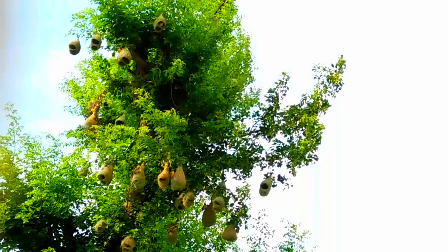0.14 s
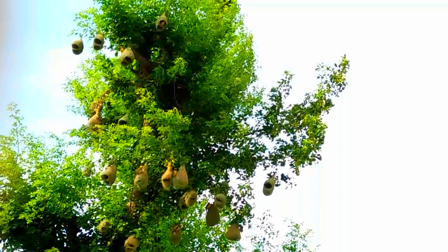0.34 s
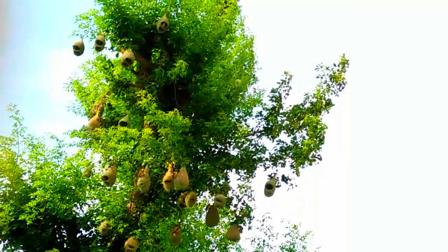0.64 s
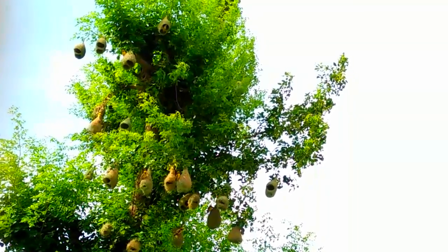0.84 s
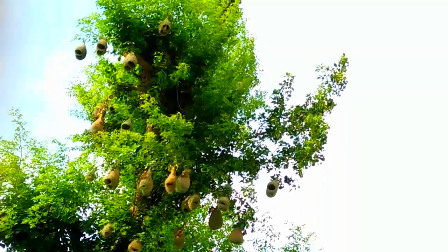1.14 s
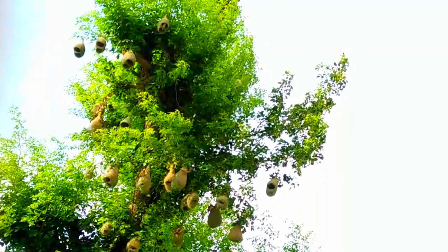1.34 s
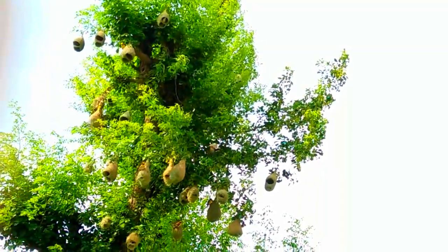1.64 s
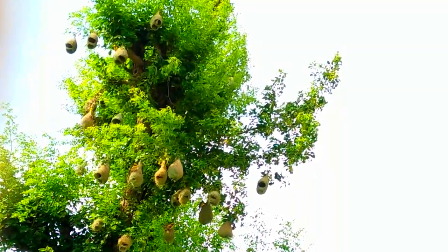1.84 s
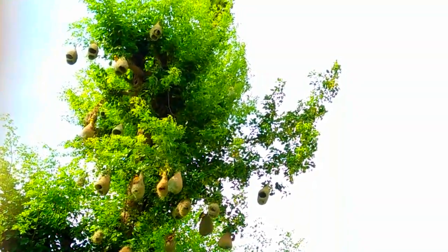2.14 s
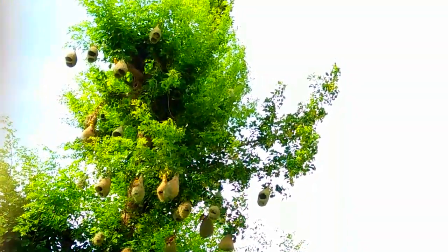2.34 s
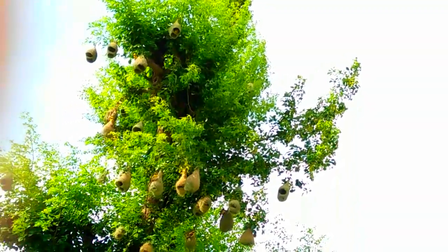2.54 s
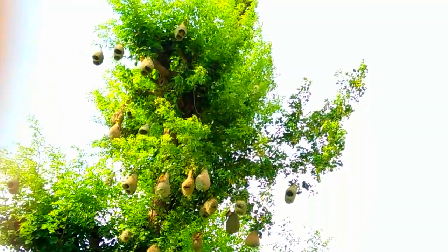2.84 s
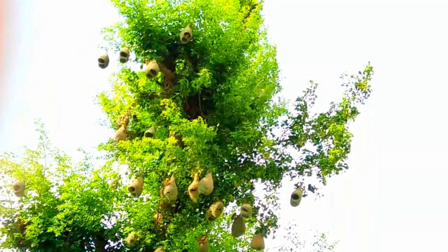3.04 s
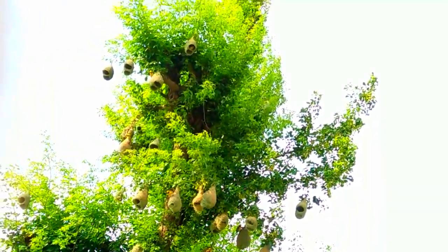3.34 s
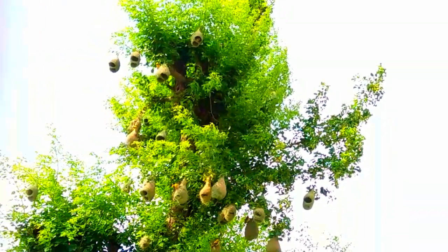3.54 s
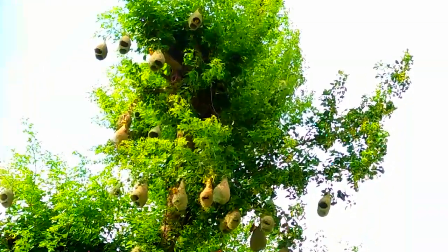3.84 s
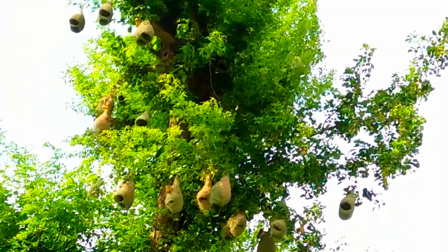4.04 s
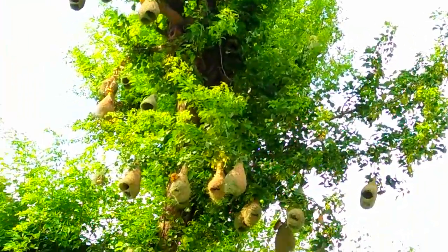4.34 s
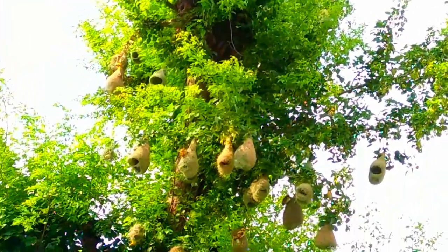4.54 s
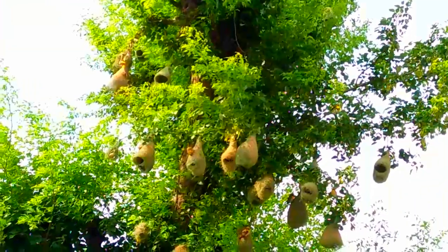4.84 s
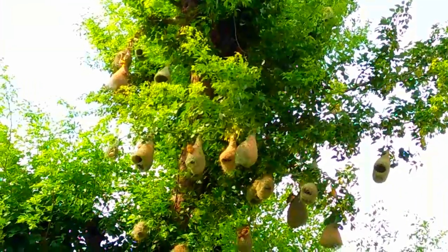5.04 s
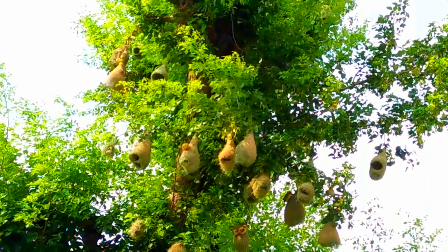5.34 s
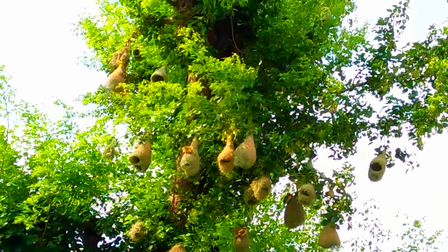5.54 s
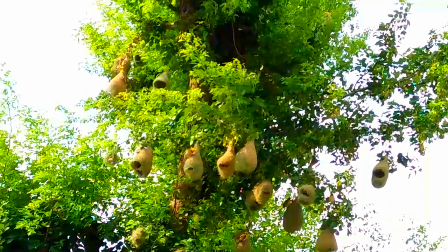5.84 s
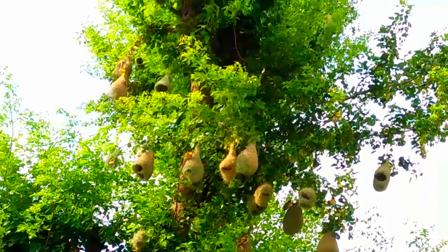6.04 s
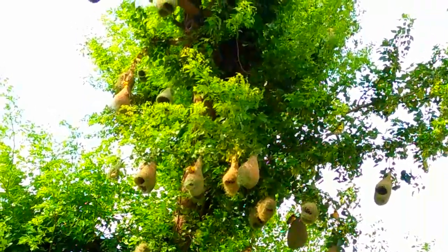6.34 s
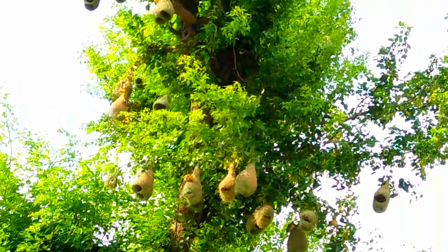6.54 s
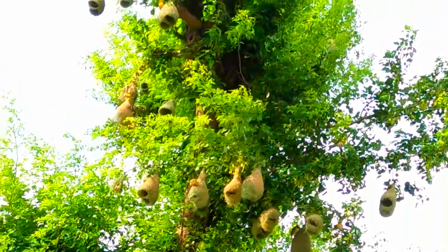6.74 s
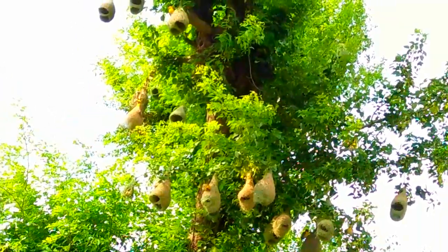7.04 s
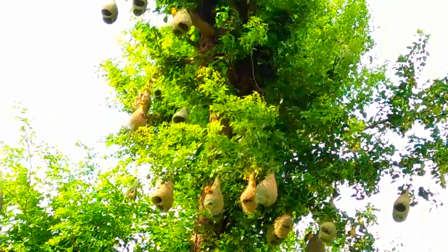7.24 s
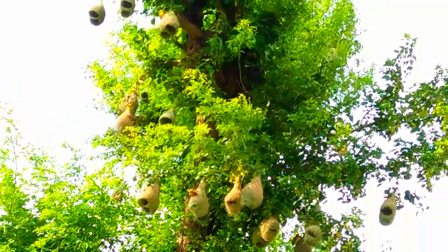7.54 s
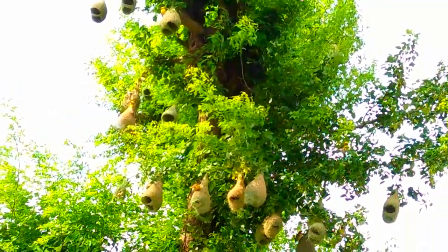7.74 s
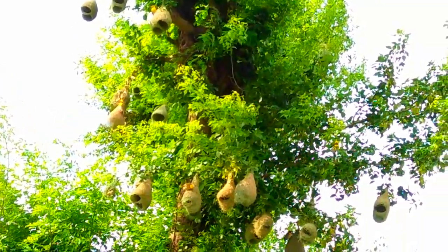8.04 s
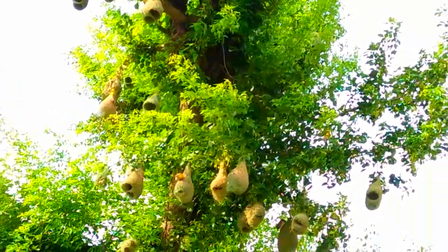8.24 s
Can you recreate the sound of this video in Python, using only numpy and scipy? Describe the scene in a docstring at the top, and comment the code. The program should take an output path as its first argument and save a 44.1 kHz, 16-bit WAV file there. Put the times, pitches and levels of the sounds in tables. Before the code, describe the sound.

Dense, overlapping buzzy wheezes, thin whistles and quick warbled chirps from a small-bird flock outdoors, over soft rumbling puffs of wind.

```python
"""Weaver bird colony in a tree

A colony sings around its hanging nests: pulses and noise through two resonances give long wheezes.
Gliding tones give thin whistles, falling slurs, stuttered pips and warbled chirps; noise gives dry rasps.
Leaves scatter the birds with a decaying tail, wind buffets the microphone as shaped noise,
and a few soft ticks, which are filtered impulses, sound close to it."""
import sys
import numpy as np
from scipy import signal
from scipy.fft import rfft, irfft
from scipy.io import wavfile
from scipy.ndimage import uniform_filter1d

SR = 44100
rng = np.random.default_rng(int(sys.argv[2]) if len(sys.argv) > 2 else 0)


def inscribe(sig):
    """Save sig as 16-bit PCM at rate SR to the path in sys.argv[1].

    A 1-D sig is mono; a 2-D sig holds one channel per row.
    Samples are clipped to [-1, 1] before scaling.
    """
    pcm = np.round(np.clip(np.atleast_2d(sig).T, -1, 1) * 32767)
    wavfile.write(sys.argv[1], SR, pcm.astype(np.int16))


N = 370440
TIME = np.arange(N) / SR   # t/s
BINS = np.fft.rfftfreq(N, 1 / SR)   # f/Hz

# All levels are relative, before any gain shared by a source.
# Wheezes: [start t/s, end t/s, lower resonance level/dB, upper resonance level/dB,
#           overtones re lower resonance level/dB, swell/(dB per s)]
WHEEZES = [(-.06, 0.456, -47.5, -51, -7, -31), (0.566, 0.997, -56, -54.5, -11, -6),
           (0.765, 1.771, -49.5, -49, -5.5, 4), (1.796, 2.46, -59.5, -66.5, -2, 6.5),
           (1.995, 2.174, -42.5, -57, -2, 1), (2.35, 3.215, -51.5, -55, -4.5, -8.5),
           (3.154, 4.41, -56.5, -71, 1, 3), (5.223, 6.575, -50.5, -55.5, -6.5, -4),
           (6.447, 7.82, -66, -71.5, -3.5, -6)]
# Throat resonances, the lower one with its overtones: [f/Hz, level/dB]
LOWER_COLOUR = [(2700, -24), (3100, -22.5), (3550, -11.5), (3850, -7.5), (4300, -4.5), (4900, -10.5),
                (7300, -28.5), (8600, -17.5), (10000, -24), (11600, -19), (14000, -34)]
UPPER_COLOUR = [(4950, -9.5), (5450, 1.5), (5750, -0.5), (6500, -21.5)]
# Narrow ringing peaks of the wheeze: [f/Hz]
RINGING_HZ = [3650, 4236, 5407]
WHEEZE_ATTACK_S, WHEEZE_RELEASE_S = 0.071, 0.14

# Drawn-out whistles: [start t/s, end t/s, first f/Hz, held f/Hz, closing bend f/Hz,
#                      first level/dB, held level/dB, closing level/dB, flutter depth/1]
WHISTLES = [ (0.021, 0.343, 3187, 3600, 7, -43, -49.5, -49.5, 0.56),
            (0.194, 0.322, 2940, 3460, 76, -49, -43, -44, 0.2),
            (0.289, 0.598, 3690, 3560, 8, -39, -50.5, -38.5, 0.77),
            (0.454, 0.639, 3582, 3470, -280, -40.5, -49, -38.5, 0.3),
            (1.047, 1.724, 3000, 3650, -220, -47.5, -57.5, -39, 0),
            (1.776, 2.198, 3015, 3692, 83, -50, -53.5, -44.5, 0.3),
            (2.286, 2.386, 3310, 3884, -160, -50.5, -36, -39.5, 0),
            (2.396, 2.992, 3028, 3585, 189, -47, -49.5, -38.5, 0.15),
            (4.1, 4.189, 4285, 4210, 377, -39.5, -38, -40.5, 0.1),
            (4.417, 4.937, 3353, 3798, -85, -43, -54, -48, 0.54),
            (4.909, 5.039, 3693, 3653, -130, -42.5, -44, -45.5, 0),
            (5.815, 6.357, 2860, 3606, 14, -59, -55.5, -46.5, 0.05)]
GLIDE_S, SETTLE_S = .15, 0.11   # settling times of pitch and level after the start
SWELL_S, BEND_S = 0.15, .045   # time scales of the closing swell and bend
FLUTTER_HZ = 138.4   # mean beat between the two sides of the syrinx

# Falling slurs: [start t/s, length t/s, first f/Hz, landing f/Hz, level/dB]
SLURS = [(.421, 0.0327, 1870, 1585, -57), (.461, 0.056, 2350, 1980, -46), (0.561, 0.076, 1990, 1433, -58.5),
         (1.049, 0.035, 4020, 3370, -47), (1.477, 0.032, 4500, 3380, -44),
         (1.644, 0.038, 4150, 3360, -39.5), (1.966, 0.036, 4150, 3430, -41),
         (2.107, 0.038, 4600, 3320, -41), (3.169, 0.02, 3250, 2670, -54.5), (3.493, 0.031, 3600, 2560, -48),
         (3.669, 0.045, 3400, 2380, -58.5), (3.875, .024, 3560, 1680, -45.5),
         (4.039, .03, 3330, 2370, -52.5), (4.365, .02, 3890, 3040, -44.5), (5.13, 0.1, 2830, 2042, -49),
         (6.554, 0.053, 3740, 2960, -51), (6.783, 0.05, 3710, 2930, -54), (8.336, 0.056, 3750, 3120, -56.5)]
FALL_S = .014   # time constant of a falling pitch
# Stuttered phrases that end in a dive: [dive t/s, pips before it/1, level/dB]
STUTTERS = [(3.857, 2, -48), (4.116, 3, -47.5), (4.357, 4, -49), (5.052, 0, -54)]
DIVE_S = 0.035   # length of a steep dive
# Warbled chirps: [start t/s, level/dB]
CHIRPS = [(.395, -47.5), (1.954, -48), (2.254, -53), (2.655, -50), (3.079, -50), (3.52, -48.5),
          (3.798, -50), (4.49, -49.5), (4.827, -47), (5.136, -46), (5.548, -47), (5.885, -44),
          (6.677, -48.5), (7.082, -52), (7.426, -53), (7.759, -51.5), (8.125, -49)]

# Thin, high arched notes: [start t/s, length t/s, top f/Hz, level/dB]
ARCHES = [(.012, 0.056, 6050, -55.5), (.078, .036, 5940, -48.5), (.263, 0.08, 5700, -50.5),
          (4.905, 0.037, 5790, -60), (4.987, 0.054, 6010, -63)]
ARCH_FALL = 0.35   # share of its top pitch that an arched note loses by its end
# Short, nearly level notes that sag and lift: [start t/s, length t/s, lowest f/Hz, level/dB]
DIPS = [(.262, 0.081, 2073, -48.5), (3.612, 0.076, 3130, -54.5), (4.205, .083, 3055, -50),
        (5.076, .058, 2577, -47)]
DIP_RISE = 0.094   # share by which they end above their lowest pitch
# Soft, low peeps from farther off: [start t/s, length t/s, top f/Hz, level/dB]
PEEPS = [(2.99, 0.097, 2620, -68.5), (3.324, 0.071, 2650, -59.5), (6.005, .22, 2470, -65),
         (6.706, .06, 2700, -66.5), (6.98, 0.11, 2570, -66.5)]
ROUGH_HZ = 3900   # turning pitch at which a curved note has its stated jitter

# Dry rasps: [start t/s, length t/s, low resonance level/dB, high resonance level/dB]
RASPS = [(1.497, 0.057, -64, -58.5), (2.693, 0.12, -65, -73), (3.081, 0.1, -63.5, -74),
         (3.493, 0.1, -62.5, -69), (4.558, .376, -69, -62.5), (5.31, 0.042, -65, -48.5),
         (5.702, 0.041, -65.5, -50)]
# Spectra of the two rasp resonances: [f/Hz, level/dB]
RASP_LOW = [(800, -7), (1120, 4), (1500, -19)]
RASP_HIGH = [(1700, -9), (2100, 3), (3700, -13)]
# Bouts of chatter from the rest of the flock: [start t/s, end t/s, call rate/(1/s), mean level/dB]
CHATTER = [(0, .17, 37.4, -52.5), (0.737, 2.4, 14, -53.5), (3.381, 4.3, 19, -56.5)]
# Soft ticks near the microphone: [start t/s, peak level/dB]
TICKS = [(1.302, -28.5), (3.278, -37), (3.534, -39.5), (3.668, -42.5), (8.071, -37)]

# Steady breeze on the microphone: [t/s, level/dB]
BREEZE = [(0, -64), (2.9, -67), (3.1, -52), (4.9, -75.5), (6.1, -52), (7, -43), (7.9, -45.5), (8.3, -74)]
BREEZE_DB = 4   # gain on the breeze alone
# Separate puffs of wind: [start t/s, length t/s, level/dB]
PUFFS = [(0, 0.43, -47), (0.683, 0.23, -48.5), (1.175, 0.17, -44), (1.653, 0.27, -45), (2.47, .19, -39.5),
         (2.929, .3, -45.5), (3.447, 0.14, -38), (3.794, .45, -50), (6.697, 0.33, -32), (7.569, .16, -39),
         (7.844, 0.24, -32.5)]
PUFF_ATTACK_S, PUFF_RELEASE_S = 0.015, 0.07
# Spectra of large and of small eddies: [f/Hz, level/dB]
WIND_COLOUR = [(22, -16.5), (59, 8), (85, 2), (155, -8), (230, -25.5), (290, -21.5), (370, -45)]
EDDY_COLOUR = [(150, -2.5), (550, -21.5), (1500, -48.5)]
# Spectrum of distant outdoor air: [f/Hz, level/dB]
AIR_COLOUR = [(60, 11.5), (200, -55), (310, -14.5), (480, -11.5), (2200, -11), (14000, -39)]
AIR_DB = -70
CUTOFF_HZ = 14300


def from_db(db):
    """Logarithmic level: 20 dB is a factor of ten in amplitude."""
    return 10 ** (np.asarray(db) / 20)


def rms_one(x):
    """Normalisation to unit root-mean-square amplitude."""
    return x / np.sqrt(np.mean(x ** 2))


def in_time(rows):
    """Linear interpolation of a curve's columns at every sample."""
    s, *columns = np.transpose(rows)
    return [np.interp(TIME, s, c) for c in columns]


def noise(colour, pulses=0):
    """Spectral shaping: white noise plus any pulses, cut steeply beyond the ends, at unit rms."""
    hz, db = np.transpose(colour)
    f = np.maximum(BINS, 1)
    gain = from_db(np.interp(np.log(f), np.log(hz), db))
    skirts = np.minimum(1, np.minimum(f / hz[0], hz[-1] / f)) ** 4
    white = rng.standard_normal(N)
    return rms_one(irfft(rfft(white + pulses) * gain * skirts, N))


def wander(t, rate):
    """Band-limited random motion: lines between Gaussian knots, `rate` knots a second."""
    knots = rng.standard_normal(SR // 2)
    return np.interp(t * rate, np.arange(len(knots)), knots)


def span(length):
    """Time base: seconds and progress 0-1 through a note of at least 10 ms."""
    t = np.arange(int(max(length, .01) * SR)) / SR
    return t, t / t[-1]


def gate(t, attack, release):
    """Sine-squared envelope: smooth opening and closing of a note."""
    nearest_end = np.minimum(t / attack, (t[-1] - t) / release)
    return np.sin(np.pi / 2 * np.clip(nearest_end, 0, 1)) ** 2


def add(track, start, sound):
    """Superposition: mix a sound into a track, cut at the track's ends."""
    i = int(min(start * SR, N - 1))
    sound, i = sound[max(-i, 0):], max(i, 0)
    track[i:i + len(sound)] += sound[:N - i]


def syrinx(t, hz, jitter, second_db=-26, third_db=-26):
    """Frequency modulation: a tone of unsteady pitch; irregular closures smear its two weak overtones."""
    phase = 2 * np.pi * np.cumsum(hz * (1 + jitter * wander(t, rate=1000))) / SR
    smeared = phase + 25 * jitter * wander(t, rate=1500)
    second = from_db(second_db) * np.sin(2 * smeared)
    third = from_db(third_db) * np.sin(3 * smeared)
    return np.sqrt(2) * (np.sin(phase) + second + third)


def falling_note(length, from_hz, to_hz, jitter=0.02):
    """Exponential relaxation: pitch drops fast and levels out; the longer the note, the cleaner."""
    t, _ = span(length)
    hz = to_hz + (from_hz - to_hz) * np.exp(-t / FALL_S)
    return gate(t, attack=0.00087, release=0.0033) * syrinx(t, hz, jitter * DIVE_S / length)


def wheeze(width_hz=50, ring_db=2, overtones_hz=6800, buzz_hz=234):
    """Source and filter: rapid syrinx snaps and rushing air pass two throat resonances; narrow peaks ring."""
    lower, upper, overtones = np.zeros((3, N))
    for start, end, lower_db, upper_db, overtones_db, swell_db_per_s in WHEEZES:
        t, _ = span(end - start)
        effort = gate(t, WHEEZE_ATTACK_S, WHEEZE_RELEASE_S) * from_db(swell_db_per_s * t)
        # overlapping wheezes add as power
        for power, db in (lower, lower_db), (upper, upper_db), (overtones, lower_db + overtones_db):
            add(power, start, (from_db(db) * effort) ** 2)
    cycles = np.cumsum(buzz_hz * (1 + .03 * wander(TIME, rate=120))) // SR
    uneven = from_db(2 * rng.standard_normal(N))
    snaps = .5 * rms_one(np.diff(cycles, prepend=0) * uneven)   # one pulse a cycle
    buzz = noise(LOWER_COLOUR, snaps)
    highpass = signal.butter(6, overtones_hz, "high", fs=SR, output="sos")
    top = signal.sosfiltfilt(highpass, buzz)
    voice = np.sqrt(lower) * (buzz - top) + np.sqrt(overtones) * top
    voice = voice + np.sqrt(upper) * noise(UPPER_COLOUR, snaps)
    rings = sum(signal.lfilter(*signal.iirpeak(hz, hz / width_hz, fs=SR), voice) for hz in RINGING_HZ)
    return from_db(-3.5) * (voice + from_db(ring_db) * rings)


def whistles():
    """Relaxation and beating: pitch glides and holds, then bends in a close; two syrinx sides flutter."""
    out = np.zeros(N)
    for start, end, first_hz, held_hz, bend_hz, first_db, held_db, closing_db, flutter in WHISTLES:
        t, u = span(end - start)
        left = t[-1] - t
        hz = held_hz + (first_hz - held_hz) * np.exp(-t / GLIDE_S) + bend_hz * np.exp(-left / BEND_S)
        db = held_db + (first_db - held_db) * np.exp(-(t / SETTLE_S) ** 2)
        db = db + (closing_db - db) * u * np.exp(-(left / SWELL_S) ** 4)
        db = db + 1.46 * wander(t, rate=70)
        beat = np.sin(2 * np.pi * np.cumsum(FLUTTER_HZ + 30 * wander(t, rate=58)) / SR)
        level = from_db(db) * gate(t, attack=0.012, release=0.019)
        level = level * (1 + flutter * np.sin(np.pi * u) * beat)   # flutter is deepest mid-note
        add(out, start, level * syrinx(t, hz, jitter=0.008, second_db=-38, third_db=-36))
    return out


def slurs():
    """Exponential pitch relaxation in single falling notes."""
    out = np.zeros(N)
    for start, length, first_hz, landing_hz, db in SLURS:
        add(out, start, from_db(db) * falling_note(length, first_hz, landing_hz))
    return out


def stutters(note_hz=1950, notes_per_s=39, growth_db=2.0, flick_s=.013,
             top_hz=3850, low_hz=2150, undertone_db=-13):
    """Pitch flicks and octave division: growing low pips, parted by flicks, lead into a steep dive."""
    out = np.zeros(N)
    t, _ = span(1 / notes_per_s)
    flick_t, u = span(flick_s)
    depth = np.sin(np.pi * u)
    for dive_s, count, db in STUTTERS:
        for k in range(int(round(count))):   # k counts back from the dive
            end = dive_s - k / notes_per_s
            gain = from_db(db - growth_db * k)
            pip = syrinx(t, note_hz, jitter=0.036, second_db=-5.5)
            add(out, end - t[-1], gain * gate(t, attack=0.0056, release=0.017) * pip)
            if k:
                hz = top_hz + (low_hz - top_hz) * depth ** 2   # down and up
                flick = syrinx(flick_t, hz, jitter=0.015)
                octave_below = syrinx(flick_t, hz / 2, jitter=.012)
                flick = flick + from_db(undertone_db) * depth * octave_below
                add(out, end - flick_s, gain * np.sqrt(np.abs(depth)) * flick)
        dive = falling_note(DIVE_S, top_hz, low_hz)
        octave_below = falling_note(DIVE_S, top_hz / 2, low_hz / 2)
        add(out, dive_s, from_db(db) * (dive + from_db(undertone_db) * octave_below))
    return out


def chirps(top_hz=4700, sag_hz=420, first_drop_hz=600, last_drop_hz=1550, warble_hz=43):
    """Sawtooth-like frequency modulation: four deepening slides, doubled lower by the other syrinx half."""
    out = np.zeros(N)
    for start, db in CHIRPS:
        quick, high, apart = rng.uniform(-1, 1, 3)
        t, u = span(3.9 / (warble_hz * (1 + .05 * quick)))
        slide = np.interp(3.9 * u % 1, [0, .75, 1], [0, 1, 0])   # slow down, quick back up
        drop = first_drop_hz + (last_drop_hz - first_drop_hz) * u
        hz = top_hz * (1 + .02 * high + .02 * wander(t, rate=150))
        hz = hz - sag_hz * u - drop * slide * (1 + .2 * apart)
        upper = syrinx(t, hz, jitter=.014)
        lower = syrinx(t, (.86 + .03 * apart) * hz, jitter=.014)
        level = from_db(db) * gate(t, attack=.012, release=.028) * (.5 + slide / 2)
        add(out, start, level * (upper + from_db(-8) * lower))
    return out


def curved_notes(rows, bend, jitter, second_db):
    """Parabolic pitch: turns a third of the way in, ends off by the share `bend`; high notes are rougher."""
    out = np.zeros(N)
    for start, length, turn_hz, db in rows:
        t, u = span(length)
        hz = turn_hz * (1 + bend * ((3 * u - 1) / 2) ** 2)
        hz = hz * (1 + 0.0102 * wander(t, rate=42.8))
        voice = syrinx(t, hz, jitter * turn_hz / ROUGH_HZ, second_db)
        voice = voice * from_db(2.5 * wander(t, rate=40))
        add(out, start, from_db(db) * gate(t, attack=0.0047, release=0.00068) * voice)
    return out


def rasps(rattle_hz=140, depth=0.17):
    """Amplitude modulation: noise in two resonances, balanced anew each time, rattles without a tone."""
    low, high = np.zeros((2, N))
    for start, length, low_db, high_db in RASPS:
        t, _ = span(length)
        rattle = np.sin(2 * np.pi * rattle_hz * t + wander(t, rate=60))
        level = gate(t, attack=.003, release=.003) * (1 + depth * rattle)
        add(low, start, from_db(low_db) * level)
        add(high, start, from_db(high_db) * level)
    return low * noise(RASP_LOW) + high * noise(RASP_HIGH)


def chatter(top_hz=4000, length=.042, bend=0.1183):
    """Random superposition: other birds throw in harsh, kinked scraps of song at uneven moments."""
    out = np.zeros(N)
    for start, end, per_s, db in CHATTER:
        for s in np.arange(start, end, 1 / per_s):
            late, high, long, loud = rng.uniform(-1, 1, 4)
            t, u = span(length * 2 ** (long / 2))
            octaves = 0.52 * (high - u) + bend * wander(t, rate=150)
            voice = syrinx(t, top_hz * 2 ** octaves, jitter=.025)
            level = from_db(db + 4 * loud) * gate(t, attack=.008, release=.014)
            add(out, s + late / per_s / 2, level * voice)
    return out


def leaves(x, t60):
    """Diffuse scattering: countless small reflections in the crown decay by 60 dB in `t60` seconds."""
    t, _ = span(2 * t60)
    tail = rng.standard_normal(len(t)) * from_db(-60 * t / t60)
    return signal.fftconvolve(x, tail / np.linalg.norm(tail))[:N]


def diffuse_treble(birds, above_hz=6300, side_db=-8):
    """Diffuse field: a hiss without direction follows the short-time level of the birds' treble."""
    highpass = signal.butter(10, above_hz, "high", fs=SR, output="sos")
    treble = signal.sosfilt(highpass, birds)
    level = np.sqrt(np.abs(uniform_filter1d(treble ** 2, size=300)))
    return from_db(side_db) * level * noise([(above_hz, 0), (12000, -4)])


def ticks(low_hz=700, high_hz=1700):
    """Impulse response of a broad band-pass: dull clicks with little ring."""
    clicks = np.zeros(N)
    bandpass = signal.butter(4, [low_hz, high_hz], "band", fs=SR, output="sos")
    shape = signal.sosfilt(bandpass, signal.unit_impulse(SR // 20))
    for start, db in TICKS:
        add(clicks, start, from_db(db) * shape / np.abs(shape).max())
    return clicks


def wind(turbulence_db=4.0, lowest_hz=40):
    """Turbulence: eddies swell with breeze and puffs; hard gusts shed smaller, higher-pitched ones."""
    breeze_db, = in_time(BREEZE)
    force = from_db(breeze_db + BREEZE_DB)
    for start, length, db in PUFFS:
        t, _ = span(length)
        add(force, start, from_db(db) * gate(t, PUFF_ATTACK_S, PUFF_RELEASE_S))
    force = force * from_db(-1.0 + turbulence_db * wander(TIME, rate=40))
    large = noise(WIND_COLOUR)
    large = large / np.sqrt(uniform_filter1d(large ** 2, size=2600))   # even out its own level
    small = noise(EDDY_COLOUR)
    eddies = force * large + force ** 1.665 * small   # small eddies grow faster with force
    highpass = signal.butter(3, lowest_hz, "high", fs=SR, output="sos")
    return signal.sosfilt(highpass, eddies)


def air():
    """Stationary random noise: the steady, shaped murmur of distant outdoor air."""
    return from_db(AIR_DB) * noise(AIR_COLOUR)


def scene():
    """Mid-side superposition: birds straight ahead; only their highest, scattered sound has width."""
    arches = curved_notes(ARCHES, -ARCH_FALL, jitter=0.0225, second_db=-11.0)
    dips = curved_notes(DIPS, DIP_RISE, jitter=0.029, second_db=-17.5)
    peeps = curved_notes(PEEPS, bend=-0.2, jitter=0.014, second_db=-13)
    birds = wheeze() + whistles() + slurs() + stutters() + chirps()
    birds = birds + arches + dips + peeps + rasps() + chatter()
    scattered = from_db(-4.5) * leaves(birds, t60=0.14)
    mid = birds + scattered + ticks() + wind() + air()
    side = diffuse_treble(birds)
    return np.array([mid + side, mid - side])


def record(dry):
    """Band limitation: an elliptic low-pass cuts the top steeply."""
    lowpass = signal.ellip(10, .2, 80, CUTOFF_HZ, fs=SR, output="sos")
    return signal.sosfilt(lowpass, dry)


dry = scene()
out = record(dry)
inscribe(out)
```